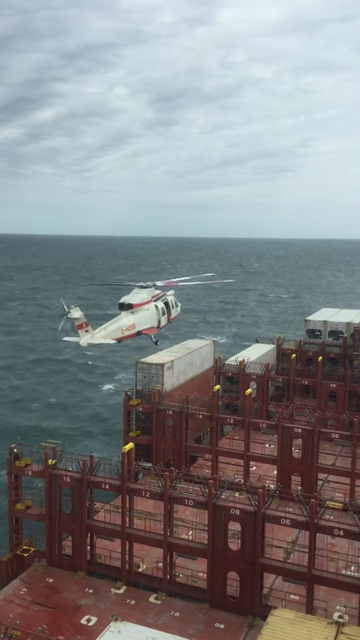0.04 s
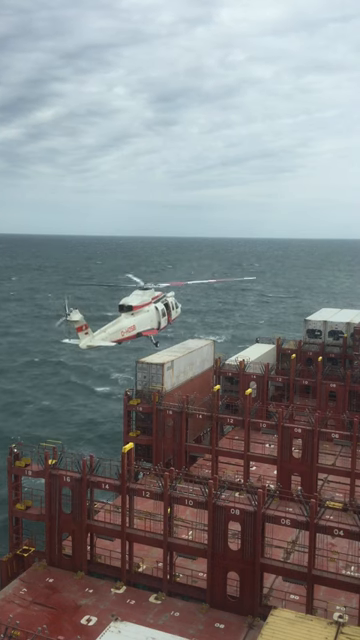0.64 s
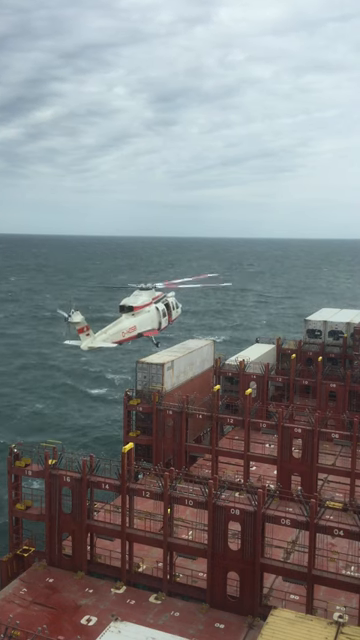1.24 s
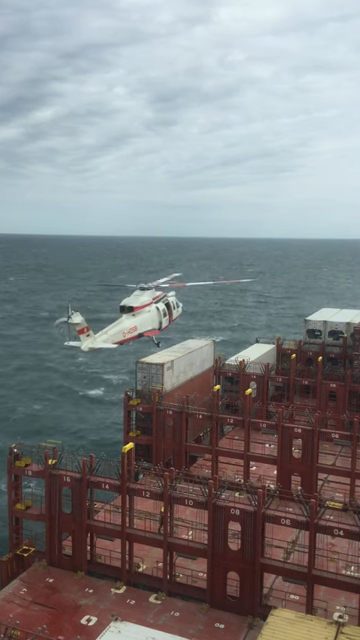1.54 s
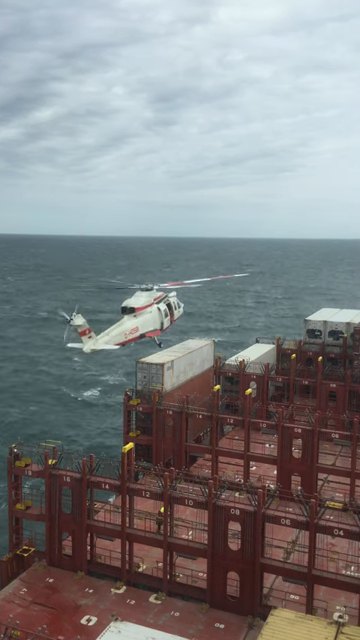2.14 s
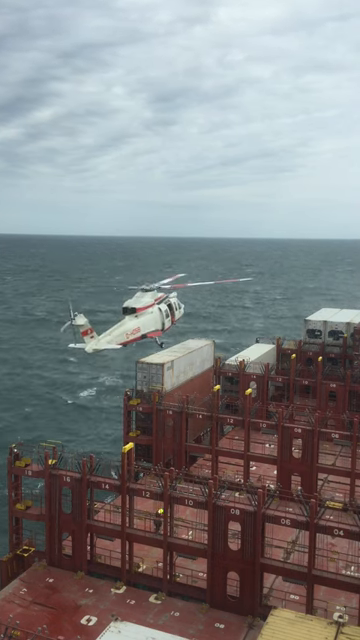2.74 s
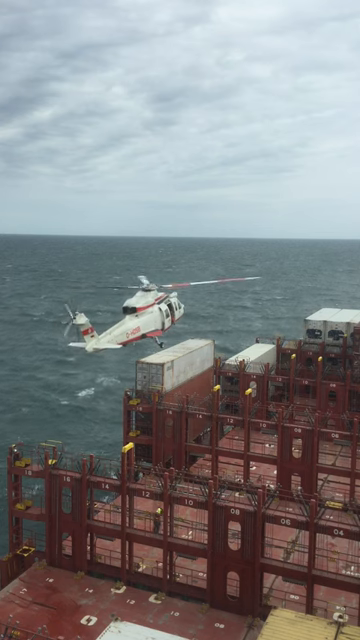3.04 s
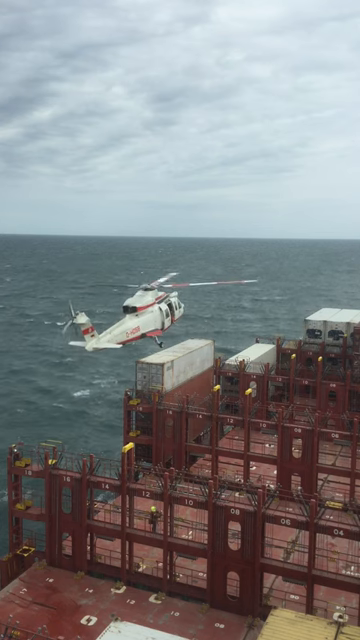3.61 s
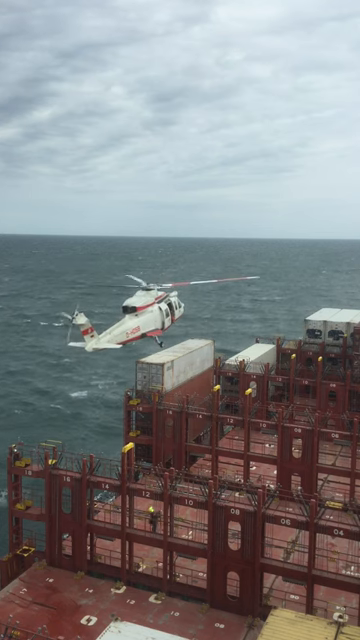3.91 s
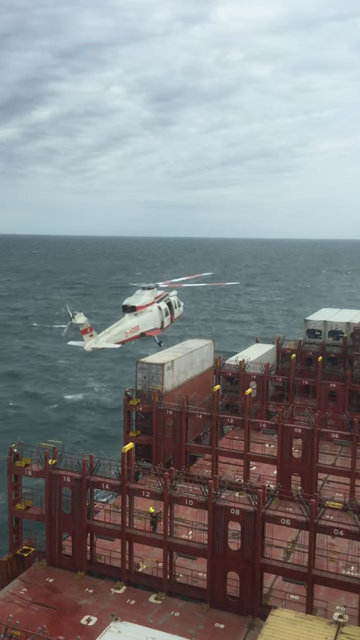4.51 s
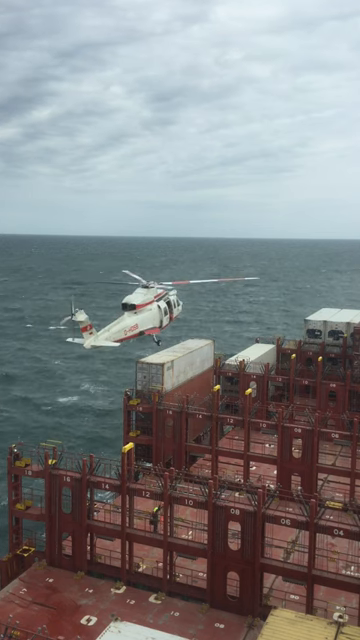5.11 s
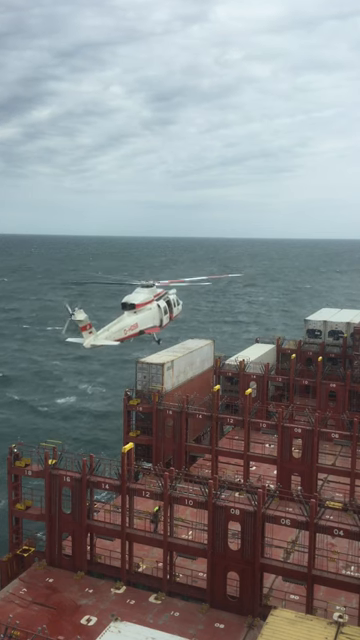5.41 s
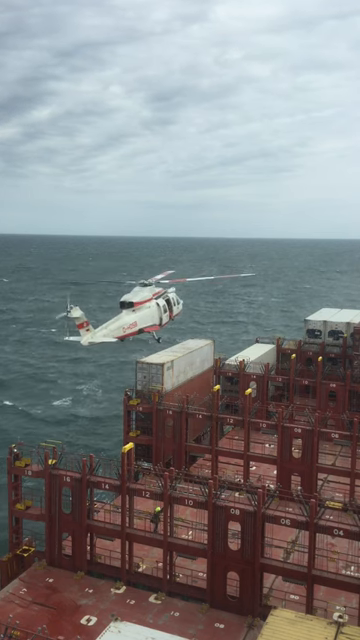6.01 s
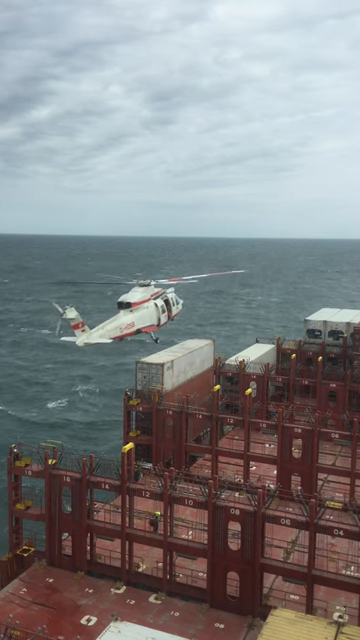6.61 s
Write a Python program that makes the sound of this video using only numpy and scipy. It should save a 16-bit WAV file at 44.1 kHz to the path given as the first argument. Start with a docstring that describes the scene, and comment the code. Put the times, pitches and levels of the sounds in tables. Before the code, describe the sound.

The steady, humming roar of a hovering helicopter wavers in sea wind, with swishing blades and a thin turbine whine.

```python
"""A deep, humming roar: a four-bladed helicopter hovers beside a container ship, heard from high aboard.
Main and tail rotor hum over the booming exhaust and the rush of the downwash. The gearbox sings,
the blades swish and the intakes whistle, all pulsing with the rotor; on top the turbines hiss and whine.
Sea wind between the aircraft and the listener makes every part waver."""
import sys
import numpy as np
from scipy import signal
from scipy.fft import rfft, irfft, next_fast_len
from scipy.io import wavfile
from scipy.ndimage import uniform_filter1d, map_coordinates

SR = 44100
rng = np.random.default_rng(int(sys.argv[2]) if len(sys.argv) > 2 else 0)


def int16_out(signal):
    """Quantize to a 16-bit WAV file."""
    q = np.round(np.clip(np.atleast_2d(signal).T, -1, 1) * 32767)
    wavfile.write(sys.argv[1], SR, q.astype(np.int16))


N = 297667


def amp(db):
    """Decibels to gain."""
    return 10 ** (np.asarray(db) / 20)


def unit(x):
    """Scale to rms 1."""
    return x / np.sqrt(np.mean(x ** 2) + 1e-20)


def fader(points, glide_s):
    """A level ride through (time, level) points, its corners rounded."""
    times, levels = np.transpose(points)
    return uniform_filter1d(np.interp(np.arange(N) / SR, times, levels), int(glide_s * SR))


def swell(peak_s, length_s):
    """A bell-shaped envelope of height 1."""
    return np.exp(-(2 * (np.arange(N) / SR - peak_s) / length_s) ** 2 / 2)


def bumps(rows):
    """A dB curve with one bell-shaped boost or cut for each row."""
    return sum(db * swell(s, length) for s, length, db in rows)


def wobble(rate):
    """A smooth random curve, rate knots a second."""
    return map_coordinates(rng.standard_normal(int(N * rate / SR) + 4), [np.arange(N) * rate / SR])


def filtered(x, response):
    """Equalise x with a gain given as a function of frequency."""
    size = next_fast_len(N + SR // 2)
    return irfft(rfft(x, size) * response(np.fft.rfftfreq(size, 1 / SR)), size)[:N]


def rush(spectrum, patchy_db):
    """Turbulent noise of rms 1, with drifting patches of stronger and weaker sound."""
    frames = signal.stft(rng.standard_normal(N), nperseg=2048)[2]
    patches = uniform_filter1d(rng.standard_normal(frames.shape), size=4, axis=0)
    patches = uniform_filter1d(patches, size=8, axis=1)
    noise = signal.istft(frames * amp(patchy_db * unit(patches)), nperseg=2048)[1][:N]
    corners, db = np.transpose(spectrum)
    eq = lambda hz: amp(np.interp(np.log(hz + 1), np.log(corners), db, right=-120))
    return unit(filtered(noise, eq))


def singing(bands):
    """Fuzzy tones: narrow bands of noise, each with its centre, half width and rms level."""
    def response(hz):
        return np.sqrt(sum(amp(db) ** 2 / width * np.exp(-((hz - centre) / width) ** 2 / 2)
                           for centre, width, db in bands))
    total_rms = np.sqrt(sum(amp(db) ** 2 for _, _, db in bands))
    return total_rms * unit(filtered(rng.standard_normal(N), response))


def spin(hz, drift):
    """A running phase whose speed drifts by a small share, like a governed shaft."""
    return 2 * np.pi * hz * np.cumsum(1 + drift * wobble(1.505)) / SR + rng.uniform(0, 2 * np.pi)


def tone(phase, scatter, rate):
    """A tone of rms 1: the direct sound plus a part scattered by moving air and steel."""
    phase = phase + rng.uniform(0, 2 * np.pi)
    return unit((1 + scatter * wobble(rate)) * np.cos(phase) + scatter * wobble(rate) * np.sin(phase))


def chop(blade, blade_db, turn_db):
    """Tremolo that swells with every blade and, as the four blades differ, once a turn."""
    return unit(amp(blade_db * np.cos(blade) + turn_db * np.cos(blade / 4)))


# Bed of the main rotor's hum: multiple of the blade rate, level/dB
MAIN_HARMONICS = [(2, -52), (3, -48), (5, -51.5), (6, -53.5), (7, -51)]
# Fader ride on its strongest harmonic, the fourth: t/s, level/dB
HUM_RIDE = [(0.0, -35.5), (0.47, -34.5), (0.6, -46), (0.87, -44.5), (1.0, -48), (1.12, -34), (1.3, -43),
            (1.5, -37), (1.64, -42), (1.8, -38.5), (2.35, -34.5), (2.6, -41), (2.74, -45), (2.9, -38),
            (3.18, -35.5), (3.33, -46), (3.57, -33), (3.7, -49), (3.87, -36.5), (4.28, -49), (4.41, -33),
            (4.53, -47), (4.61, -33), (4.71, -47), (5.1, -37), (5.27, -46.5), (5.58, -38.5), (5.7, -40.5),
            (5.87, -39), (6.4, -36), (6.55, -48.5), (6.75, -39)]
def main_rotor(blade):
    """Each passing blade pushes the air: a low harmonic hum, partly scattered by the wind."""
    bed = sum(amp(db) * tone(k * blade, scatter=0.28, rate=4) for k, db in MAIN_HARMONICS)
    hum = amp(fader(HUM_RIDE, glide_s=0.05) - 0.45) * tone(4 * blade, scatter=0.18, rate=11)
    return bed + hum


# Fader ride on the tail rotor's fundamental: t/s, level/dB
TAIL_RIDE = [(0.0, -49.5), (0.73, -47.5), (1.03, -42), (1.65, -45), (1.93, -45), (2.9, -41.5),
             (3.23, -46.5), (4.42, -44.5), (4.73, -46.5), (5.0, -43.5), (6.75, -48.7)]
# Its overtones: multiple of the tail blade rate, level/dB
TAIL_HARMONICS = [(2, -50), (3, -54.5)]
def tail_rotor():
    """The tail blades pass faster and add a higher hum."""
    blade = spin(hz=114.35, drift=0.00074)
    fundamental = amp(fader(TAIL_RIDE, glide_s=0.15) - 2) * tone(blade, scatter=0.32, rate=4)
    overtones = sum(amp(db) * tone(k * blade, scatter=0.14, rate=5.5) for k, db in TAIL_HARMONICS)
    return fundamental + overtones


# EQ of the exhaust roar: f/Hz, level/dB
ROAR_EQ = [(15, -34.5), (45, -24), (56, -17.5), (68, -9), (80, -7), (92, -9.5), (120, -6), (150, -2),
           (170, -3.5), (205, -10), (243, -13.5), (400, -29.5)]
# Fader ride on the boom between surges: t/s, level/dB
BOOM_RIDE = [(0, -38.5), (1.0, -37.5), (1.5, -44), (2.7, -41), (3.2, -36), (4.2, -37), (5.1, -36.5),
             (5.55, -39.5), (6.0, -39), (6.7, -32.5)]
# Exhaust surges, most near the boom's pitch: peak t/s, length/s, f/Hz, level/dB
EXHAUST_SURGES = [(0.433, 0.037, 171, -26.5), (0.602, .06, 305, -35.5), (0.614, 0.09, 171.5, -34),
                  (0.849, 0.068, 174, -31.5), (1.169, 0.091, 127.7, -33), (1.406, 0.044, 171, -32.5),
                  (1.801, 0.066, 128.9, -31.5), (2.037, 0.21, 172.9, -33), (2.329, .06, 300, -39),
                  (2.513, 0.046, 172, -30.5), (3.05, 0.12, 173.6, -31.5), (3.445, 0.17, 178, -33.5),
                  (3.723, .09, 173.4, -33), (3.96, .07, 164.8, -33), (4.777, 0.086, 173, -33),
                  (5.329, 0.12, 173, -28), (5.79, 0.064, 174.8, -29.5), (6.195, 0.115, 172, -29.4),
                  (6.482, .05, 129.1, -33), (6.491, 0.092, 174.7, -35)]
def exhaust():
    """A broad low roar with a booming tone that flutters in the wind and ducks under each surge."""
    roar = amp(-34.5) * rush(ROAR_EQ, patchy_db=1.13)
    phase = spin(hz=172.6, drift=0.00491) + 0.24 * wobble(6.9)
    boom = amp(fader(BOOM_RIDE, glide_s=0.2) + 1) * tone(phase, scatter=0.58, rate=14)
    surging = sum(swell(s, length) for s, length, _, _ in EXHAUST_SURGES)
    duck = np.sqrt(np.clip(0.5 - surging, 0, 1))
    surges = sum(amp(db) * swell(s, length) * unit(np.cos(spin(hz, drift=0.00508)))
                 for s, length, hz, db in EXHAUST_SURGES)
    return roar + duck * boom + surges


# EQ of the downwash: f/Hz, level/dB
WASH_EQ = [(220, -25), (262, -2.5), (300, 0.5), (345, -5.5), (390, -9), (430, -12.5), (620, -28.5)]
# Its fader ride: t/s, level/dB
WASH_RIDE = [(0.0, -46), (1.43, -47), (1.73, -45.5), (2.55, -49), (2.75, -47.5), (3.03, -45), (3.3, -43.5),
             (3.75, -49.1), (4.55, -45), (5.33, -47), (5.88, -44), (6.33, -46.5), (6.75, -45.5)]
def downwash():
    """Air driven down by the rotor fills the low mids and drifts with the wind."""
    return amp(fader(WASH_RIDE, glide_s=0.12) + 4) * rush(WASH_EQ, patchy_db=0.53)


# A low engine or ventilation hum and the higher tones of the gears: f/Hz, level/dB
MACHINE_TONES = [(72.7, -51), (321, -49), (363.6, -56.5), (594, -64.5), (689, -64.5), (957, -64),
                 (1204, -66.5), (1308, -68)]
def machinery():
    """Running machines hold steady pitches that waver in the wind."""
    return sum(amp(db) * tone(spin(hz, drift=0.001532), scatter=0.6, rate=14) for hz, db in MACHINE_TONES)


# Fader ride on the main gear mesh: t/s, level/dB
MESH_RIDE = [(0.0, -51.5), (0.3, -54), (0.62, -56.5), (0.85, -50.5), (2.35, -52), (2.5, -54), (3.4, -48.8),
             (3.65, -53), (4.67, -50), (4.95, -54), (5.1, -49.5), (5.3, -53.5), (5.5, -51.5), (6.4, -55),
             (6.65, -48), (6.75, -50)]
# Fuzzy tones of exhaust and gearbox: f/Hz, half width/Hz, level/dB
CASING_BANDS = [(128.8, 3.4, -45.5), (211.7, 3.5, -50), (314.6, 6, -50.5), (493.7, 11, -59),
                (697.5, 14, -60.5), (1186, 14, -65), (1665, 28, -70), (1845, 28, -75.5)]
def gearbox(blade):
    """The main gear mesh and the singing casing throb with the rotor load."""
    mesh_tone = amp(-7) * tone(spin(hz=770, drift=0.0015), scatter=0.5, rate=20)
    mesh_fuzz = singing([(794.6, 22, -3)])
    mesh = amp(fader(MESH_RIDE, glide_s=0.1)) * (mesh_tone + mesh_fuzz)
    return (singing(CASING_BANDS) + mesh) * chop(blade, blade_db=1.2, turn_db=-1.06)


# EQ of the blade swish: f/Hz, level/dB
SWISH_EQ = [(300, -36.5), (440, -1), (500, 0.5), (545, -5.5), (650, -2.5), (820, 1), (915, -5.5), (980, -1),
            (1060, -2.5), (1170, -0.5), (1370, -3), (1500, -12), (1660, -10), (1950, -33.5)]
# Its drift on the wind: t/s, level/dB
SWISH_RIDE = [(0.0, -51), (0.6, -52), (1.4, -48.5), (1.68, -53), (2.08, -50), (2.25, -51.0), (2.48, -51),
              (2.68, -51.5), (3.25, -49.5), (3.73, -53), (4.6, -49.5), (5.1, -52.0), (5.83, -52),
              (6.03, -52), (6.15, -51), (6.53, -53.0), (6.65, -49.5), (6.75, -53.5)]
def blade_swish(blade):
    """Midrange air noise off the blades, pulsing lightly with the rotor."""
    level_db = fader(SWISH_RIDE, glide_s=0.11) + 2.33 + 0.5 * wobble(90)
    return amp(level_db) * rush(SWISH_EQ, patchy_db=1.33) * chop(blade, blade_db=0.15, turn_db=0.36)


def flutter():
    """The fast level jitter, in dB, that turbulent air puts on the treble."""
    return 0.93 * wobble(24)


# EQ of the intake rush: f/Hz, level/dB
INTAKE_EQ = [(1500, -28), (1980, -12), (2200, -6.5), (2380, 0.5), (2600, -5.5), (2880, -9.5), (2950, -13),
             (3440, -18), (3540, -28.5), (5000, -51)]
# Fuzzy intake whistles: f/Hz, half width/Hz, relative level/dB
INTAKE_WHISTLES = [(2216, 11, -4), (2320, 8.1, -1.5), (2360, 27, -0.5), (2414, 12, -3.5)]
# Brief flares of those whistles: peak t/s, length/s, boost/dB
WHISTLE_FLARES = [(2.38, .07, 8.5), (2.54, 0.054, 14.5)]
# Fader ride on rush and whistles together: t/s, level/dB
INTAKE_RIDE = [(0.0, -67.5), (0.3, -67), (0.55, -69.5), (0.9, -65.5), (1.75, -68.5), (1.88, -66.7),
               (2.4, -65.5), (2.98, -67), (3.48, -66), (3.7, -68), (4.3, -69), (4.58, -66), (5.55, -70.5),
               (5.78, -67.7), (6.75, -66.5)]
def intakes(blade, gust_db):
    """Air drawn into the engines rushes and whistles, pulsing with the rotor."""
    suction = amp(0.9 * gust_db + flutter()) * rush(INTAKE_EQ, patchy_db=2.4)
    whistle_db = -9.5 + bumps(WHISTLE_FLARES) + 0.85 * wobble(9)
    whistles = amp(whistle_db) * unit(singing(INTAKE_WHISTLES))
    gain = amp(fader(INTAKE_RIDE, glide_s=0.1) + 6.5)
    return gain * (suction + whistles) * chop(blade, blade_db=1.06, turn_db=0.57)


# Drift of the turbine hiss on the wind: t/s, level/dB
HISS_RIDE = [(0.0, -75.5), (0.62, -77.5), (1.12, -75.4), (1.7, -76.6), (2.18, -75), (2.8, -77), (3.03, -76),
             (3.6, -80), (4.3, -77.7), (4.55, -76), (5.35, -79), (5.73, -78.2), (5.88, -75), (6.05, -77.5),
             (6.75, -78)]
# EQs of the hiss and of its faint fizzy top: f/Hz, level/dB
HISS_EQ = [(2500, -19.5), (3400, 2), (4100, -2), (4400, 0.5), (5300, -3), (6200, -7.5), (7000, -14),
           (7800, -23), (9000, -35)]
FIZZ_EQ = [(7000, -19.5), (7800, -10.5), (8500, -3), (10000, -0.5), (11000, -5), (13100, -5.5),
           (14300, -11.5), (15200, -18.5)]
# Stage whistles in the hiss and in the fizz: f/Hz, half width/Hz, relative level/dB
STAGE_WHISTLES = [(3610, 20, -7.5), (4370, 48, -5.5), (4630, 20, -5), (5030, 35, -6), (5300, 40, -2)]
TOP_WHISTLES = [(10170, 120, -11), (14170, 90, -16)]
# Accents where one stage rings out: peak t/s, length/s, f/Hz, level/dB
STAGE_RINGS = [(0.298, .4, 5400, -89.5), (1.23, .1, 4630, -83.5), (1.6, .25, 10190, -91),
               (1.98, .18, 4610, -80.5), (2.25, .2, 4360, -81.5), (2.353, .25, 10060, -92),
               (2.6, .22, 5320, -84)]
def turbines(gust_db):
    """A gusty hiss, with fuzzy whistles from the turbine stages and a faint fizz on top."""
    ride_db = fader(HISS_RIDE, glide_s=0.076)
    hiss = amp(ride_db + gust_db + flutter() + 0.96) * rush(HISS_EQ, patchy_db=3)
    whistles = amp(ride_db - 12) * singing(STAGE_WHISTLES)
    rings = sum(amp(db) * swell(s, length) * singing([(hz, 0.0042 * hz, 0)])
                for s, length, hz, db in STAGE_RINGS)
    fizz_db = -85.5 + 0.3 * (ride_db - ride_db.mean())  # follows part of the hiss's slow swing
    top_whistles = amp(2.5 * wobble(4.2)) * singing(TOP_WHISTLES)
    fizz = amp(fizz_db) * (rush(FIZZ_EQ, patchy_db=1.1) + top_whistles)
    return hiss + whistles + rings + fizz


# Drift of the compressor whine on the wind: t/s, level/dB
WHINE_RIDE = [(0.0, -83), (0.07, -84), (0.21, -87), (0.38, -84), (0.54, -82), (0.94, -89.5), (1.13, -89.5),
              (1.4, -90), (1.93, -82), (2.3, -88), (2.66, -93), (3.1, -91.5), (3.74, -89), (4.03, -84),
              (4.27, -88), (4.35, -81), (4.48, -86), (4.8, -81.7), (5.15, -82), (5.45, -86), (5.62, -83.5),
              (6.0, -87.5), (6.28, -91), (6.48, -87), (6.61, -83), (6.75, -93)]
# A brief dip in the whine: bottom t/s, length/s, gain/dB
WHINE_DROP = [(4.7, 0.064, -13)]
# Thin tones below the whine: f/Hz, level/dB
THIN_TONES = [(6479, -94.5), (9000, -103)]
def compressors():
    """The compressors give a needle-thin whine and two fainter high tones."""
    whine_db = fader(WHINE_RIDE, glide_s=0.05) + bumps(WHINE_DROP) + 0.5 + 0.5 * wobble(12)
    whine = amp(whine_db) * tone(spin(hz=12958, drift=0.00008), scatter=0.15, rate=40)
    thin = sum(amp(db) * tone(spin(hz, drift=0.0002), scatter=0.3, rate=30) for hz, db in THIN_TONES)
    return whine + thin


# Short gusts that carry over more hiss and intake rush: peak t/s, length/s, boost/dB
WIND_GUSTS = [(2.39, .04, 4.5), (3.5, 0.029, 3), (4.56, 0.06, 1)]
def scene():
    """The hovering aircraft in mono, its layers sharing one main rotor and the same gusts."""
    blade = spin(hz=20.82, drift=0.0016)  # one cycle for each passing main blade
    gust_db = bumps(WIND_GUSTS)
    lows = main_rotor(blade) + tail_rotor() + exhaust()
    body = downwash() + machinery() + gearbox(blade) + blade_swish(blade)
    highs = intakes(blade, gust_db) + turbines(gust_db) + compressors()
    return (lows + body + highs)[None]


def record(dry):
    """A brick-wall high cut on the mix."""
    return filtered(dry[0], lambda hz: hz < 15250)[None]


dry = scene()
out = record(dry)
int16_out(out)
```